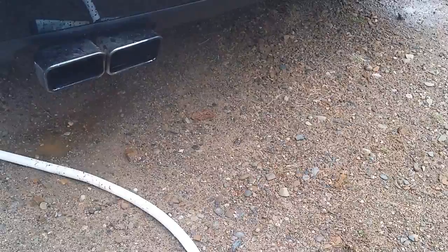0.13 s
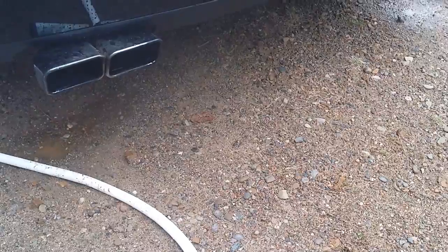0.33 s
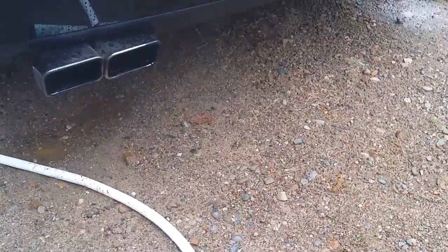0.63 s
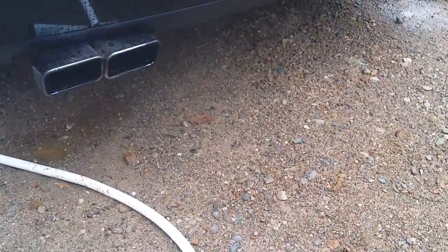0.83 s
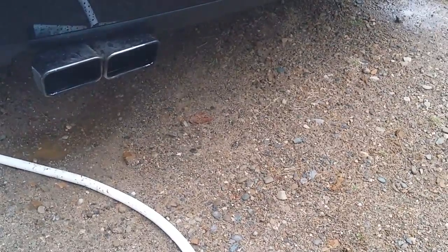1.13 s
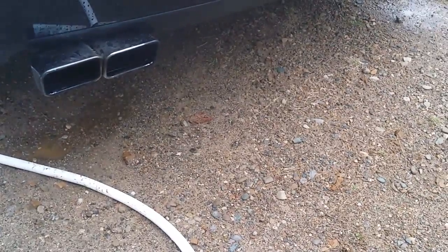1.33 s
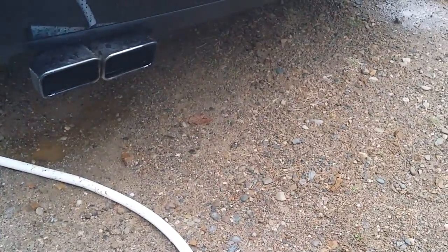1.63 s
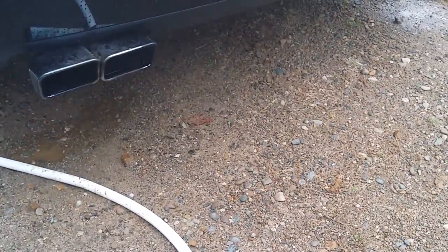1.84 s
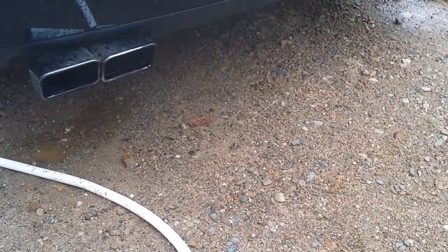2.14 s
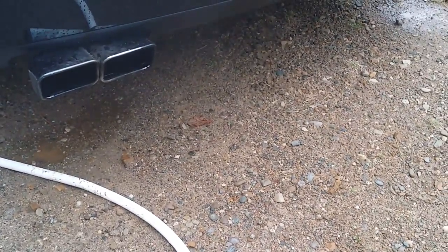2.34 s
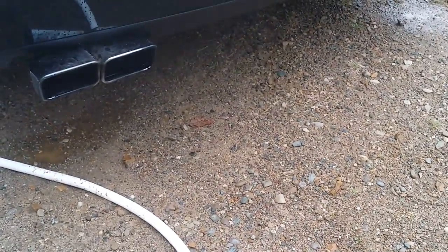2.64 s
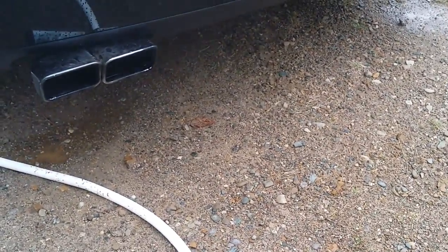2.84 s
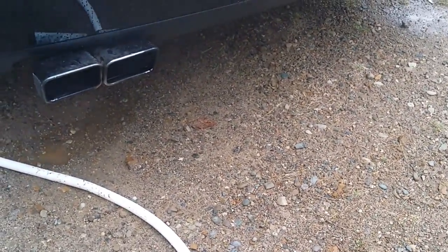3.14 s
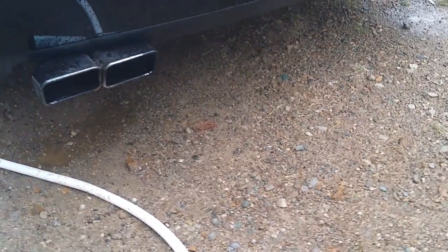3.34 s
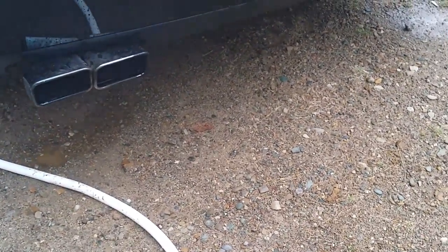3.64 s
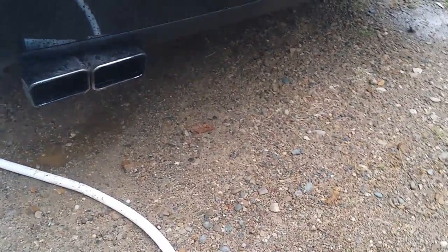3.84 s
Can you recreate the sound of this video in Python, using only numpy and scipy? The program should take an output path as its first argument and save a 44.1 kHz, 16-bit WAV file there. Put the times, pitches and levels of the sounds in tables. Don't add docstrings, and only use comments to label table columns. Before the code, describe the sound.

A car engine idles outdoors, heard close beside twin tail pipes. After a brief silence the deep humming boom fades in quickly, then holds steady with a slight uneven lope, soft gas hiss and faint ticking.

```python
import sys
import numpy as np
from scipy import signal
from scipy.fft import rfft, irfft
from scipy.io import wavfile
from scipy.ndimage import uniform_filter1d, minimum_filter1d

SR = 44100
rng = np.random.default_rng(int(sys.argv[2]) if len(sys.argv) > 2 else 0)


def generate_wav(sig):
    pcm = np.round(np.clip(np.atleast_2d(sig).T, -1, 1) * 32767).astype(np.int16)
    wavfile.write(sys.argv[1], SR, pcm)


def undo_db(level):
    steps = np.asarray(level, float) / 20
    return 10 ** steps


N = 176400

# (time [s], firing rate [1/s], level [dB])
IDLE_SPEED = [(0.45, 90.47, -8.5), (0.7, 89.53, -8.5), (0.95, 89.46, -8.1), (1.2, 89.69, -8.5),
              (1.45, 91.38, -7.8), (1.7, 91.19, -7.7), (1.95, 90.92, -8.0), (2.2, 90.3, -8.3),
              (2.45, 89.41, -9.1), (2.7, 89.19, -9.0), (2.95, 89.08, -8.8), (3.2, 89.58, -8.8),
              (3.45, 90.12, -8.6), (3.7, 90.56, -8.5), (3.95, 90.53, -8.5)]
# (order [per cycle], level [dB])
BOOM_ORDERS = [(6, -44.7), (7, -41.4), (8, -8.4), (9, -37.4), (10, -28.6), (11, -34.4), (12, -42.0),
               (13, -36.8), (14, -33.5), (15, -38.1), (16, -30.1), (17, -26.7), (18, -32.3), (19, -45.9),
               (20, -42.7), (21, -40.4), (22, -45.6), (23, -41.2), (24, -35.1), (25, -33.9), (26, -39.5),
               (27, -59.7)]
CYLINDER_DB = [
    1,
    -3,
    -2,
    2,
    0,
    -1,
    1,
    2,
]
PIPE_PHASE_LAG = [(11, 0), (14, 1.3), (15, 3), (18, 3.2), (21, 4.2), (24, 5.6), (25, 7.4), (26, 8.7)]
# (order [per cycle], level [dB])
BARK_ORDERS = [(32, -48.0), (34, -48.4), (35, -43.5), (36, -45.1), (40, -49.9), (41, -45.9), (42, -45.3),
               (43, -47.4), (45, -38.7), (46, -49.8), (48, -45.9), (49, -46.4), (50, -42.9), (51, -40.6),
               (52, -44.6), (56, -40.0), (58, -41.7), (59, -39.4), (60, -41.2), (61, -42.5), (64, -46.0),
               (66, -47.2), (68, -50.2), (70, -50.2), (72, -46.0), (74, -50.0), (75, -43.8), (76, -48.4),
               (77, -50.0), (78, -49.3)]
# (frequency [Hz], width [Hz], level [dB])
PIPE_MODES = [(405.3, 48, -10.5), (485.6, 68, 0), (549, 53, -7), (665.4, 95, 2), (785, 81, 0),
              (846, 180, -3), (927, 70, -0.5)]
# (frequency [Hz], density [dB per Hz])
HISS_SPECTRUM = [(950, -6), (1700, -14), (3500, -15.5), (4000, -23), (6100, -22.5), (8300, -23.5),
                 (9700, -33), (15500, -35.5)]
# (frequency [Hz], left over right [dB])
HISS_BALANCE = [(1000, -1), (3100, 1.5), (3800, 5), (6200, 14.5), (7900, -1.5), (10000, -0.5), (11500, 9.5),
                (15400, 11)]
# (frequency [Hz], left-right likeness [0-1])
HISS_COHERENCE = [(900, 0.84), (1400, .3), (2100, 0.085), (3200, 0.32), (4200, 0.35), (15000, .1)]
# (frequency [Hz], level [dB], 60 dB
# decay time [s])
TICK_MODES = [(1050, 1.5, 0.045), (1156, -2, 0.078), (1300, -4, 0.056), (1452, -3, .05), (1656, -1.5, .05),
              (2180, 4, .05), (2257, 1.5, 0.044), (3060, -2, 0.042), (3560, -15, .015),
              (4814, -12.5, 0.039), (5510, -11, 0.04), (5875, -10.5, 0.044), (6226, -5.5, 0.024),
              (8100, -17, .02)]
# (frequency [Hz], density [dB per Hz])
RUMBLE_SPECTRUM = [(20, -15.5), (45, -11), (90, 3), (140, -8), (185, -8), (240, -8), (285, -10), (365, -16)]

FIRST_FIRING = 3.887
BOOM_WAVER_DB, BOOM_WAVER_RAD = 0.7, 0.06
BARK_DB, BARK_WAVER_DB, BARK_WAVER_RAD = 1.5, 1.6, 0.35
GAS_DB, GAS_PULSE = -33, 0.54
PUFF_SHARPNESS = 1.8
HISS_DB, RUMBLE_DB = -42.5, -29.5
LOW_HISS_PULSE, HIGH_HISS_PULSE, HISS_SPLIT_HZ = 0.77, 0.6, 3840
PIPE_ECHO, ECHO_SAMPLES = 0.35, 453
TICKS_DB, TICK_SPREAD_DB, TICKS_PER_S = -44.5, 4.2, 600
NEAR_PIPE_DB, RIGHT_LAG_SAMPLES = 2.6, 7
START_S, STEP_S, FADE_S = 0.3892, 0.01, 0.28
CEILING = 0.9


def evened(x):
    return x / np.sqrt(np.mean(x ** 2) + 1e-20)


def read(points, hz):
    f, value = np.transpose(points)
    return np.interp(np.log(hz + 1), np.log(f + 1), value)


def drift(top_hz):
    t = np.arange(0, N + 64, 64) / SR
    wander = np.zeros(len(t))
    for f in np.geomspace(0.3, top_hz, 16):
        wander += np.sin(2 * np.pi * (f * t + rng.random())) / np.sqrt(f)
    return np.interp(np.arange(N) / SR, t, evened(wander))


def resonate(x, hz, width):
    turn = np.exp(2j * np.pi * hz * np.arange(x.shape[-1]) / SR)
    r = np.exp(-np.pi * width / SR)
    return 2 * (turn * signal.lfilter([1 - r], [1, -r], x / turn)).real


def noise(colour, same, pan):
    hz = np.fft.rfftfreq(N, 1 / SR)
    a, b = rfft(rng.standard_normal((2, N)))
    c = np.clip(read(same, hz), -1, 1)
    side = undo_db(read(pan, hz) / 2)
    edge = (hz > colour[0][0]) * (hz < colour[-1][0])
    left = a * side
    right = (c * a + np.sqrt(1 - c ** 2) * b) / side
    return irfft(np.array([left, right]) * undo_db(read(colour, hz)) * edge, N)


def place(x, left_db):
    left = x[0] * undo_db(left_db / 2)
    right = np.roll(x[-1], RIGHT_LAG_SAMPLES) * undo_db(-left_db / 2)
    return np.array([left, right])


def crank():
    s, rate, db = np.transpose(IDLE_SPEED)
    t = np.arange(N) / SR
    firings = FIRST_FIRING + np.cumsum(np.interp(t, s, rate)) / SR
    return firings, np.interp(t, s, db - db.mean())


def puffs(firings):
    cylinder = np.round(firings).astype(int) % len(CYLINDER_DB)
    strength = undo_db(1.8 * np.array(CYLINDER_DB)[cylinder])
    return strength * np.exp(PUFF_SHARPNESS * (np.cos(2 * np.pi * firings) - 1))


def boom(firings, level_db):
    lope = np.angle(np.fft.fft(undo_db(np.array(CYLINDER_DB))))
    count = len(CYLINDER_DB)
    out = np.zeros(N)
    for k, db in BOOM_ORDERS:
        k = int(k)
        loose = 0.3 if k == count else 1
        lag = np.interp(k, *np.transpose(PIPE_PHASE_LAG))
        phase = 2 * np.pi * k / count * firings + lope[k % count] - lag
        level = undo_db(db + loose * BOOM_WAVER_DB * drift(8))
        out += level * np.cos(phase + loose * k / count * BOOM_WAVER_RAD * drift(8))
    return place([np.sqrt(2) * undo_db(level_db) * out], NEAR_PIPE_DB)


def bark(firings, flow):
    out = np.zeros((2, N))
    for k, db in BARK_ORDERS:
        phase = 2 * np.pi * (k / len(CYLINDER_DB) * firings + rng.random()) + BARK_WAVER_RAD * drift(6)
        side = rng.standard_normal(2)
        level = np.sqrt(2) * undo_db(db + BARK_DB + BARK_WAVER_DB * drift(6))
        left = level * undo_db(0.4 * side[0]) * np.cos(phase + 0.43 * side[1])
        right = level * undo_db(-1.2 * side[0]) * np.cos(phase)
        out += [left, right]
    air = noise([(20, 0), (5000, 0)], [(300, 0.93), (900, 1.0)], [(300, 0.0058), (900, 0)])
    air = air * (1 + GAS_PULSE * flow)
    ring = np.zeros((2, N))
    for k, (hz, width, db) in enumerate(PIPE_MODES):
        mode = resonate(resonate(air, hz, width), hz, width)
        ring += (-1) ** k * undo_db(db) * mode
    return place(out + undo_db(GAS_DB) * evened(ring), 1.7)


def hiss(flow):
    air = noise(HISS_SPECTRUM, HISS_COHERENCE, HISS_BALANCE)
    low = signal.sosfiltfilt(signal.butter(2, HISS_SPLIT_HZ, fs=SR, output="sos"), air)
    high = air - low
    rung = low + PIPE_ECHO * np.roll(low, ECHO_SAMPLES, axis=1)
    rung = rung + PIPE_ECHO ** 2 * np.roll(low, 2 * ECHO_SAMPLES, axis=1)
    low_pulse = evened(1 + LOW_HISS_PULSE * flow)
    high_pulse = evened(1 + HIGH_HISS_PULSE * uniform_filter1d(flow ** 2, size=250))
    air = 0.99 * rung * low_pulse + high * high_pulse
    return undo_db(HISS_DB + 0.4 * drift(34)) * air / np.sqrt(np.mean(air.mean(0) ** 2))


def ticks(flow):
    struck = rng.random(N) < flow * TICKS_PER_S * 2 / SR
    size = undo_db(TICK_SPREAD_DB * np.minimum(rng.exponential(1, N), 4)) * struck
    part = rng.integers(0, len(TICK_MODES), N)
    t = np.arange(2000) / SR
    out = np.zeros((2, N))
    for k, (hz, db, t60) in enumerate(TICK_MODES):
        onset = np.minimum(t / 0.0021, 1)
        tone = onset * undo_db(db - 60 * t / t60) * np.sin(2 * np.pi * hz * t)
        ring = signal.oaconvolve(size * (part == k), tone)[:N]
        side = undo_db(read(HISS_BALANCE, hz) / 2)
        echo = np.roll(ring, part[k] * 9 + 20)
        out += [ring * side, 0.54 * (ring + echo) / side]
    return undo_db(TICKS_DB) * evened(out)


def rumble():
    air = noise(RUMBLE_SPECTRUM, [(30, 1.0), (100, 0.47), (300, 0.28)], [(30, 3.1), (300, 4.2)])
    return undo_db(RUMBLE_DB + 2.6 * drift(32)) * evened(air)


def scene():
    firings, level_db = crank()
    flow = puffs(firings)
    exhaust = boom(firings, level_db) + bark(firings, flow)
    return exhaust + place(hiss(flow) + ticks(flow) + rumble(), 0)


def roll_off(x):
    return signal.sosfilt(signal.butter(12, 15410, fs=SR, output="sos"), x)


def record(dry):
    steps = np.ceil((np.arange(N) / SR - START_S) / STEP_S)
    x = dry * np.clip(steps * STEP_S / FADE_S, 0, 1)
    duck = minimum_filter1d(np.minimum(CEILING / (abs(x).max(0) + 1e-9), 1), size=400)
    smooth = uniform_filter1d(uniform_filter1d(duck, size=200), size=200)
    return roll_off(x * smooth)


dry = scene()
out = record(dry)
generate_wav(out)
```